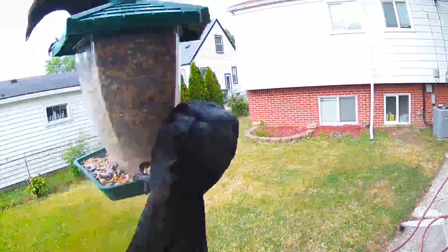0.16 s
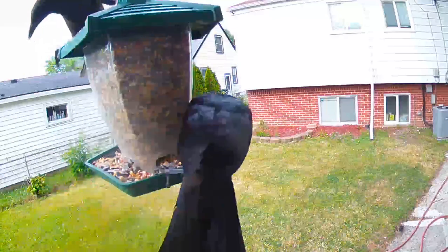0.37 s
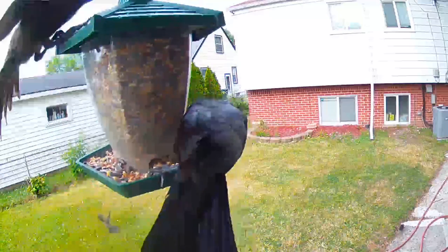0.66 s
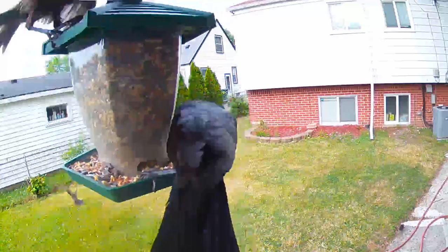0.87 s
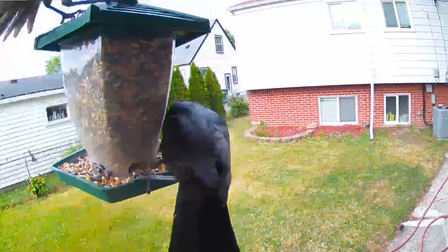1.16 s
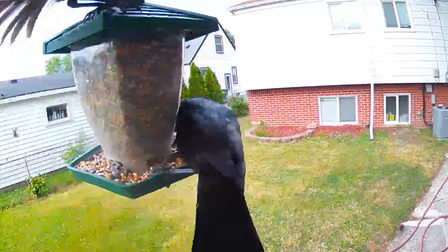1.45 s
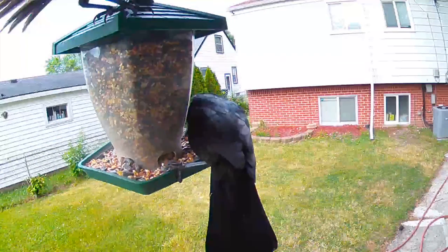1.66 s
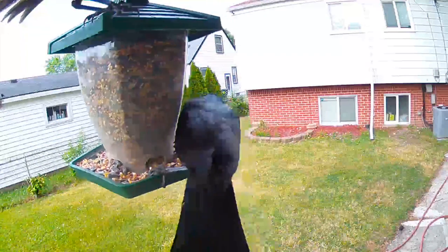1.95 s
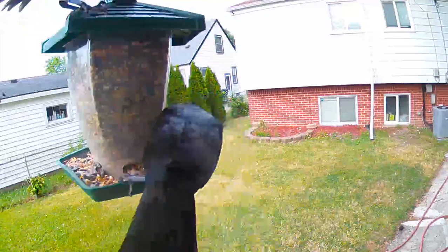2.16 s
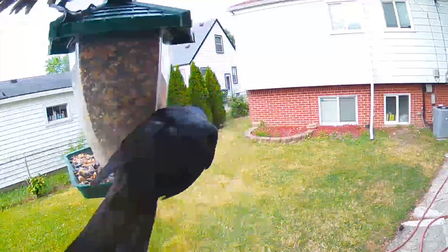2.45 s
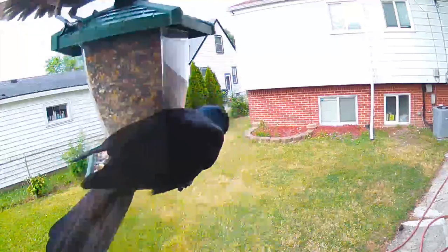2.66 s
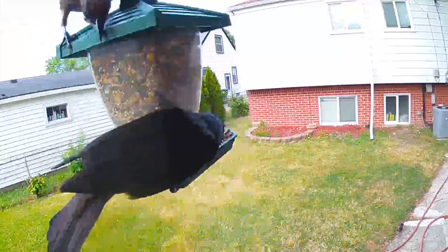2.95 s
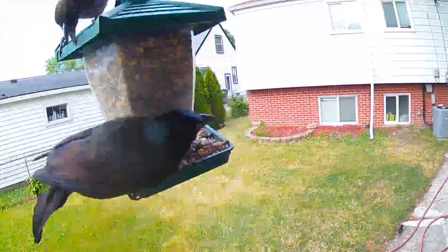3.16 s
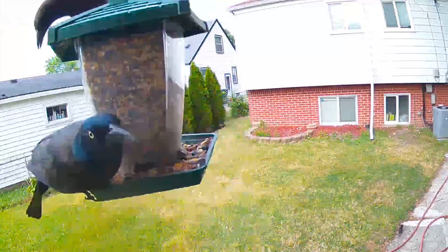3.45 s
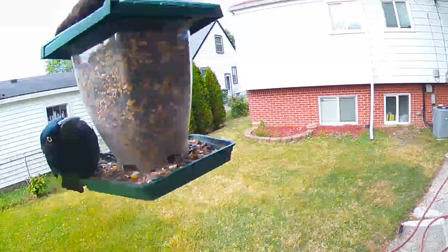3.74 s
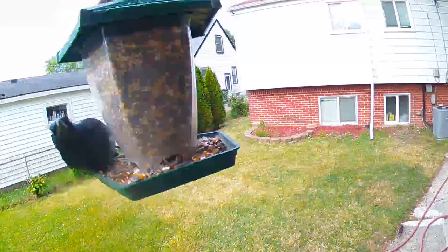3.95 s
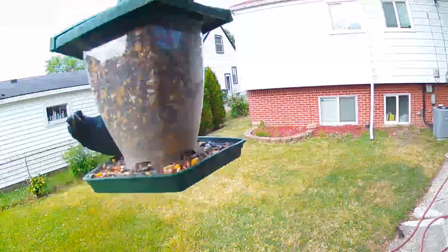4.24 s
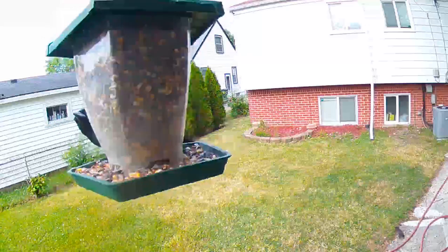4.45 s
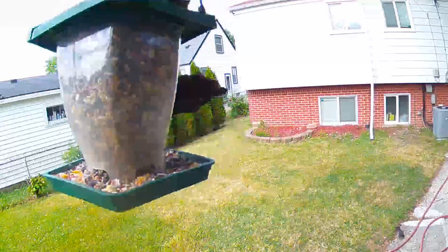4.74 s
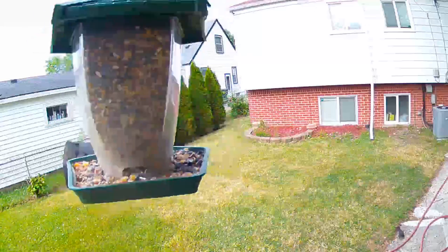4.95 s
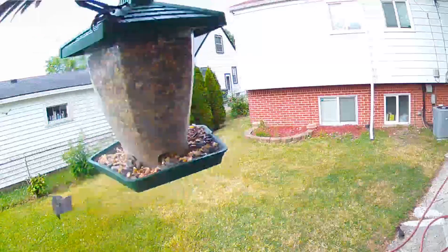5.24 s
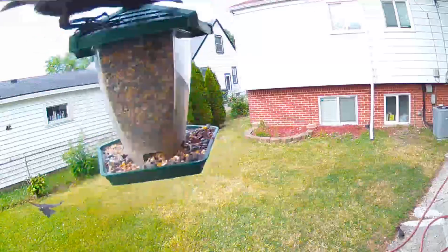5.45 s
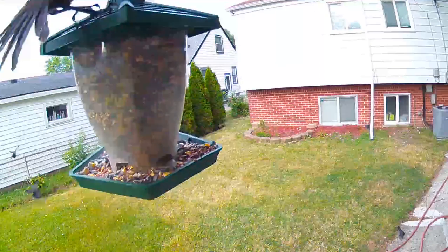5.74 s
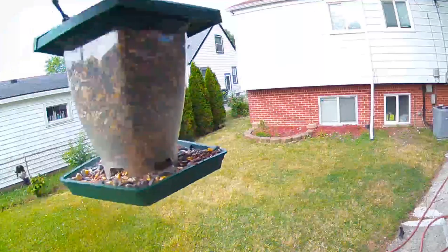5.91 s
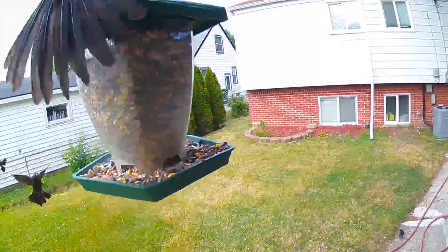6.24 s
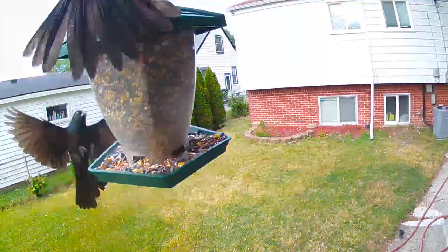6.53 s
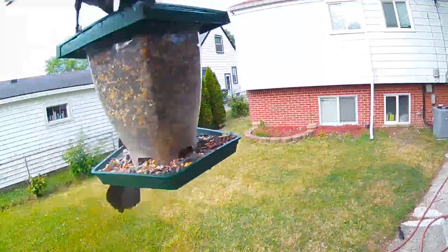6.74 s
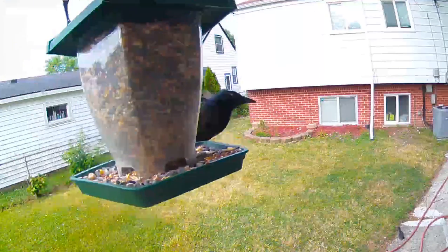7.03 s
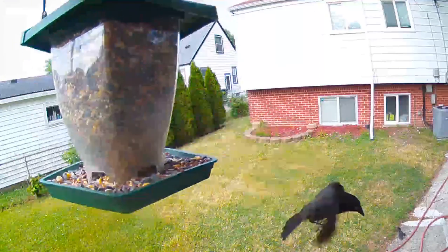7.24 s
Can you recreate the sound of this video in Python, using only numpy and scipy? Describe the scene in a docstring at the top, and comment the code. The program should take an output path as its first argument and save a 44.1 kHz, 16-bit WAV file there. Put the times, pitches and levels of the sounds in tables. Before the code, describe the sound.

Very close to the microphone, large blackbirds shuffle on a plastic seed feeder: dry cracks, short hollow tray taps, brushing feathers and falling seed. It quiets as sparrows chirp and faint rasps answer farther off. A loud grating call bursts out nearby, then heavier knocks and landings return with a low buffet of air. Two more rasps follow, over a soft suburban wash and low hum, with short echoes from house fronts.

```python
"""Blackbirds at a hanging plastic seed feeder, close to the microphone, over a suburban yard's wash and hum.
At first they shuffle and peck: brushing noise, sharp cracks and short rings of the tray. Short broad puffs, probably
of wings, come at 0.7 and 1.3 s, sparrows chirp from 1.4 s in gliding tones, and far rasps answer from 1.8 s. At 2.7 s
a near bird rasps with two voices at once. A faint whistle follows at 4 s, then from 4.4 s more shuffling and hard
landings. At about 5.3 s low noise buffets the microphone. Near rasps return at 5.5 and 6.3 s; house fronts echo."""
import sys
import numpy as np
from scipy import signal
from scipy.fft import rfft, irfft
from scipy.io import wavfile
from scipy.ndimage import uniform_filter1d

SR = 44100
rng = np.random.default_rng(int(sys.argv[2]) if len(sys.argv) > 2 else 0)


def digitize_waveform(pressure):
    """Quantize a signal to 16-bit integers and store it at the path in sys.argv[1].

    Rows of a 2-D input are taken as channels; values are limited to [-1, 1].
    """
    field = np.atleast_2d(pressure).T
    bounded = np.clip(field, -1, 1)
    quanta = np.round(bounded * 32767).astype(np.int16)
    wavfile.write(sys.argv[1], SR, quanta)


N = 325017  # length of the scene in samples
T = np.arange(N) / SR  # time in seconds

# The steady wash of the yard. Each row: frequency in Hz, relative level in dB per Hz.
YARD_COLOUR = [(12, -42.5), (20, -37.5), (86, -4), (180, -8), (239, -7), (324, -19.5), (398, -9),
               (452, -17.5), (569, -21), (1840, -33), (2260, -32), (2510, -32), (7530, -38), (9000, -62.5),
               (11700, -90), (19800, -120)]
YARD_DB = -57
# A distant machine's hum. Each row: frequency in Hz, level in dB.
HUM = [(96.9, -64.5), (145.3, -63), (296.1, -68.5), (393.0, -78), (495.3, -76)]
# Puffs of breeze on the microphone. Each row: time of the crest in seconds, level in dB.
PUFFS = [(.43, -46), (1.05, -58), (1.33, -49), (2.87, -72), (4.59, -51.5), (5.26, -38), (5.52, -45.5),
         (5.81, -49), (6.96, -50.5)]
PUFF_RISE_DB_PER_S, PUFF_FALL_DB_PER_S, CALM_DB = 135.5, 61.5, -77.5

# A faint level whistle far off. One row: start in seconds, length in seconds, pitch in Hz, level in dB.
WHISTLE = (4.05, .21, 2599, -68.5)
# The shape of a sparrow's chirp. Each row: time in seconds, pitch in Hz before the note's own factor,
# level in dB relative to the note.
CHIRP_SHAPE = [(0, 3970, -6), (.008, 4740, 4.5), (.024, 4866, 3), (.032, 3950, 3), (.042, 3165, -19),
               (.05, 3346, -1), (.062, 4200, 3), (.068, 3300, -3.5), (.085, 2800, 6.5), (.09, 2700, -25)]
# Sparrow notes. Each row: start in seconds, level in dB, pitch factor, share of the chirp that is sung.
CHIRPS = [(1.436, -62, 0.94, 0.82), (2.357, -63.5, 1.02, 0.97), (3.195, -61, 0.94, 0.85),
          (3.474, -59.5, 0.99, 0.95), (3.766, -70.5, 1.04, 0.37), (3.865, -73, 1.07, 0.38),
          (4.15, -60, 1.02, 0.93), (5.065, -62.5, .95, 0.44), (5.807, -67, 1.07, 0.37),
          (5.895, -59.5, 1.02, 0.36), (5.94, -78, 0.69, .3), (5.98, -67, 0.9, 0.29),
          (6.155, -71, 0.92, 0.4), (6.678, -60.5, 0.92, 0.33), (6.755, -65, 1.06, 0.41),
          (5.14, -62, 1.1, 0.37), (7.191, -66, 1, .3)]
# Two short broad puffs, probably of wings, at 0.7 and 1.3 s, then far rasps from 1.8 s. Each row: start in seconds,
# length in seconds, level in dB, size factor of the three lower resonances, size factor of the two upper ones,
# lift of the upper ones in dB, widening factor of all resonances.
PUFFS_AND_FAR_RASPS = [(0.668, 0.061, -44.5, 0.52, 0.84, -4, 4.7),
                       (1.259, 0.075, -51.5, 0.73, 0.95, -3, 2.7),
                       (1.762, .29, -58.5, 0.77, 0.87, -1.5, 3.6), (2.459, 0.31, -61.5, 0.88, 0.8, -9, 4.1),
                       (3.435, 0.3, -62, 0.81, 0.77, 0, 4.8), (4.324, 0.29, -62.5, 0.82, 0.82, 7.5, 3.2)]

# Lumps of low turbulence on the microphone; the rows from 5.255 to 5.351 s shape one buffet.
# Each row: middle in seconds, level in dB, half length in seconds, top of the turbulence in Hz.
LUMPS = [(5.255, -30.5, .02, 70.4), (5.287, -11.5, 0.015, 207), (5.31, -16.5, 0.011, 373),
         (5.319, -16.5, 0.01122, 101), (5.351, -32.5, 0.036, 120), (5.458, -35.5, 0.015, 89),
         (5.814, -36, .018, 100), (6.429, -38.5, 0.00612, 300), (1.339, -46.5, 0.014, 247),
         (.39, -44, .03, 89.5), (4.676, -47, 0.043, 90)]
# Feathers and feet brushing the feeder, one table a spell of shuffling. Each row: time in seconds, level in dB,
# brightness (treble above that level) in dB.
RUSTLE_SPELLS = [
    [(0.0, -64, 0.5), (0.192, -66.5, 2), (0.578, -55.5, 1.5), (0.9, -69.5, 7), (1.092, -63.5, 7),
     (1.388, -61.5, 2), (1.65, -69, -8)],
    [(4.42, -65, 7.5), (4.642, -56, -1.7), (4.784, -66.5, -1), (5.092, -68.5, 2), (5.268, -54.5, 1),
     (5.56, -56, -2), (5.696, -59.5, 1), (6.046, -82.5, 11), (6.58, -79, 18.5), (6.884, -64.5, 5.5),
     (7.37, -66.5, 3.5)],
]
# The colour of the brushing. Each row: frequency in Hz, relative level in dB per Hz.
RUSTLE_COLOUR = [(180, -47.5), (300, -7), (629, -0.5), (1540, -5.5), (3100, -6), (3890, -8.5), (6130, -11),
                 (7920, -11), (9000, -31), (11700, -52), (19800, -120)]
# Wing and tail feathers sweeping past. Each row: middle in seconds, level in dB, half length in seconds,
# brightness in dB.
SWISHES = [(.01, -59.5, 0.018, 8.5), (0.054, -60, 0.0072, 1), (0.147, -44.5, 0.022, 6),
           (0.205, -46.5, 0.025, 1.5), (0.265, -64.5, 0.01, 16.5), (0.374, -56, 0.012, 8),
           (0.547, -52.5, 0.005, 0), (0.868, -63, 0.0085, 12.5), (0.901, -57.5, .008, 11),
           (0.941, -61, 0.02, 11), (1.041, -60.5, 0.02, 14), (1.048, -61, 0.015, 2), (4.508, -71, 0.01, 26),
           (4.645, -62, 0.0055, 8), (5.337, -53.5, 0.0046, 16.5), (5.381, -49, 0.005, 8),
           (5.562, -49.5, 0.033, -8), (5.919, -58, 0.006, 9.5), (6.765, -69, 0.0096, 16)]

# The clear blows of claws, bill and seed. Each row: start in seconds, crack level in dB, crack centre in Hz,
# tray ring level in dB, length in seconds (the crack loses 32 dB in it).
TAPS = [(0.0273, -37, 3500, -50, 0.014), (0.208, -28.5, 6720, -24, .006), (0.3675, -29, 6400, -53, 0.0087),
        (0.4107, -30, 2240, -31.5, 0.015), (0.4678, -28.5, 3960, -37.5, 0.0068),
        (0.495, -30.5, 4100, -38, 0.015), (0.5035, -34, 4260, -36, .018), (0.5404, -37, 6740, -40.5, 0.02),
        (0.571, -32.5, 4600, -35.5, 0.011), (0.6138, -29.5, 7280, -35, .004), (0.643, -34, 6630, -41, .012),
        (0.752, -38, 7500, -45, .014), (0.961, -37.5, 2970, -39.5, 0.017), (1.014, -29.5, 7190, -45, .018),
        (1.052, -37, 6910, -31.5, 0.017), (1.0929, -36.5, 3240, -43, 0.0099),
        (1.124, -40, 6960, -63, 0.0062), (1.1625, -44, 3360, -42.5, .011), (1.19, -26, 6860, -44, 0.022),
        (1.2102, -30, 3400, -39.5, 0.0034), (1.5579, -39, 3000, -40.5, 0.02),
        (2.1467, -49, 3700, -63, 0.013), (2.5194, -37.5, 4140, -45.5, .013),
        (2.6973, -39, 3300, -35.5, 0.012), (3.186, -48, 4440, -50, 0.021), (3.2904, -50, 7560, -70, .012),
        (4.49, -24.5, 7970, -61, 0.0049), (4.5313, -32, 5370, -60, .0077),
        (4.573, -28, 3020, -32.5, 0.0041), (4.5873, -50, 2220, -30, .012), (4.6114, -45, 2920, -25, .012),
        (4.6295, -24.5, 4500, -33, 0.0037), (4.7143, -40, 2180, -21.5, 0.0078),
        (4.7226, -51, 2810, -30, .012), (4.801, -20, 3220, -25, 0.0072), (4.9822, -54, 2740, -28.5, 0.016),
        (5.095, -34, 6900, -42, .017), (5.1038, -37, 3440, -41, 0.025), (5.145, -36.5, 2310, -29.5, 0.021),
        (5.1996, -37.5, 5960, -55, 0.023), (5.2154, -31, 3060, -36, 0.014), (5.309, -48, 2100, -34, .012),
        (5.337, -29, 3020, -38, .01), (5.3464, -28, 2540, -22.5, .017), (5.359, -35, 2900, -25, .01),
        (5.3728, -23, 3690, -40, 0.011), (5.394, -35, 2710, -21.5, .0091), (5.417, -37.5, 4100, -33, .0085),
        (5.4433, -34.5, 2830, -25, 0.0098), (5.5615, -48, 3220, -21.5, .011), (5.594, -40, 7160, -45, .01),
        (5.6114, -29.5, 2360, -19.5, 0.011), (5.625, -40, 2870, -30, .012), (5.668, -41.5, 7120, -46, .011),
        (5.717, -37, 7390, -45, .014), (5.908, -42, 4930, -59, .02), (6.026, -50, 2690, -30.5, .012),
        (6.111, -41, 4220, -52, 0.014), (6.137, -40.5, 4340, -35.5, 0.01), (6.154, -38.5, 4400, -53, .0052),
        (6.4386, -30, 3010, -26.5, 0.0091), (6.671, -39, 6800, -63, .01), (6.682, -37, 4400, -63, .008),
        (6.7521, -39, 7740, -57, .0092), (6.8377, -31.5, 3100, -66, 0.0038),
        (6.8985, -37, 2500, -25.5, 0.012), (6.9104, -54, 2840, -29.5, .012), (6.923, -39.5, 4660, -48, .01),
        (7.1084, -41.5, 2900, -48, 0.0073), (7.1973, -51, 2860, -32.5, .012)]
# The ringing tones of the tray, before each blow's own shift. Each row: frequency in Hz, relative level in dB,
# time to fall by 60 dB in seconds.
TRAY = [(350.6, -5, 0.057), (516, -8, 0.029), (772, 3, 0.02), (942, 6, .025), (1255, -1, 0.009),
        (1650, -26, 0.009), (2520, -18, 0.0057), (2890, -10, 0.014)]
# Faint ticks of falling seed: level above the rustle's treble, scatter either way, tray ring against the crack.
TICK_DB, TICK_SCATTER_DB, TICK_RING_DB = 11.5, 8.5, -10
TICKS_PER_S, TICK_S, TICK_LOW_HZ, TICK_HIGH_HZ = 12, .01, 3000, 7500

# Three resonances of the windpipe, then two of the open bill, before each call's own factors.
# Each row: frequency in Hz, width in Hz, level in dB.
THROAT = [(1920, 1270, -21.5), (3357, 520, 1), (4080, 1200, -12), (5920, 640, -10.5), (7570, 880, -7.5)]
# Near rasps, one table a call, a point at each crest and trough of the throb. Each row: time in seconds,
# pitch of the low voice in Hz, level of the rasp in dB.
NEAR_CALLS = [
    [(2.7, 399.5, -63), (2.72, 439.6, -40.5), (2.737, 522, -26.5), (2.772, 653.2, -21), (2.794, 563, -26),
     (2.826, 651, -21), (2.85, 547, -27), (2.882, 689.7, -21), (2.9, 500, -33.5), (2.925, 470.8, -38.5),
     (2.942, 517, -31.5), (2.953, 565.6, -23.5), (2.97, 659.6, -24), (2.99, 450.6, -30.5), (3.01, 408, -48)],
    [(5.468, 432.5, -50), (5.488, 540, -30), (5.52, 688, -26), (5.535, 637, -32), (5.552, 438, -53)],
    [(6.262, 410.5, -58), (6.283, 445.4, -41), (6.298, 520.3, -34), (6.338, 682, -27),
     (6.362, 572.4, -33.5), (6.392, 680.6, -25), (6.415, 550.3, -34.5), (6.443, 681, -28),
     (6.475, 545, -37), (6.514, 702, -29), (6.535, 520, -40), (6.552, 429, -43), (6.58, 400, -50)],
]
# The voice of each near call. Each row: throat size factor, bill size factor, bill level in dB, level of the voices'
# sum tone in dB, high voice pitch factor, low voice lift in dB, high voice lift in dB, how much more both voices
# follow the rasp in dB per dB.
VOICES = [(0.96, 1.01, -0.5, -6, .995, -0.6, 0.6, 0.05), (0.89, 0.876, -12, -19, 1.06, -5, .5, .6),
          (0.94, 0.98, -5.5, 1, 1.04, -5, 1, .9)]
# One number a near call: a factor on breath and on unsteadiness of pitch and level.
HOARSENESS = [.85, 1.5, 1.3]
# Tighter membranes: what goes with the low voice's pitch, before each call's own factor and lifts.
# Each row: low voice in Hz, high voice in Hz, low voice level in dB, high voice level in dB.
EFFORT = [(401, 640, -76, -52.5), (439.8, 826, -65, -43), (472.3, 945, -57, -41), (520.4, 985, -51, -44),
          (560, 1000, -47, -42), (651.4, 1105, -39, -41), (699, 1140, -39, -38.5)]
FULL_RASP_DB = -25  # the rasp level at which the two bare voices get no extra lift or sag

EDGE_HZ = 9200  # the band limit of the recorder


def gain_of(db):
    """Turns decibels into a plain multiplier."""
    return 10 ** (np.asarray(db) / 20)


def evened(x):
    """Scales a sound to rms 1."""
    return x / np.sqrt(np.mean(x ** 2) + 1e-20)


def add(mix, s, sound):
    """Adds a sound at s seconds, cut off at the end of the mix."""
    part = mix[max(round(s * SR), 0):][:len(sound)]
    part += sound[:len(part)]


def low(x, hz):
    """Keeps what lies below hz."""
    return signal.sosfilt(signal.butter(2, hz, fs=SR, output="sos"), x)


def resonate(x, hz, width):
    """Shifts hz down to zero, smooths, and shifts back: a resonance of gain 1."""
    turn = np.exp(2j * np.pi * hz * np.arange(len(x)) / SR)
    r = np.exp(-np.pi * width / SR)
    return 2 * (turn * signal.lfilter([1 - r], [1, -r], x / turn)).real


def resonate_twice(x, hz, width):
    """Two equal resonances in a row fall off more steeply."""
    return resonate(resonate(x, hz, width), hz, width)


def coloured(x, points):
    """Gives x a spectrum drawn on a log-frequency axis, rms 1."""
    f, db = np.transpose(points)
    hz = np.fft.rfftfreq(len(x), 1 / SR)
    curve_db = np.interp(np.log(hz + 1), np.log(f), db)
    return evened(irfft(rfft(x) * gain_of(curve_db), len(x)))


def wander(count, span):
    """Slow chance of rms 1 that changes over span seconds."""
    size = max(int(span * SR), 2)
    return evened(uniform_filter1d(uniform_filter1d(rng.standard_normal(count), size), size))


def breeze_db():
    """Each puff swells quickly and dies slowly, down to a calm."""
    puffs = []
    for s, db in PUFFS:
        slope = np.where(T < s, PUFF_RISE_DB_PER_S, PUFF_FALL_DB_PER_S)
        puffs.append(db - slope * abs(T - s))
    return np.maximum(np.max(puffs, axis=0), CALM_DB)


def yard():
    """Steady wash whose low part swells, a wavering hum, and breeze on the microphone."""
    wash = gain_of(YARD_DB) * coloured(rng.standard_normal(N), YARD_COLOUR)
    swell = gain_of(3.0 * wander(N, 0.12))
    wash = wash + (swell - 1) * low(wash, 890.0)
    # noise through narrow resonances gives tones that waver
    hum = sum(gain_of(db) * evened(resonate_twice(rng.standard_normal(N), hz, 11.0)) for hz, db in HUM)
    air = coloured(rng.standard_normal(N), [(10, -12.5), (30, 0), (55, -11), (120, -31), (300, -68.0)])
    fizz = gain_of(-87.5) * evened(resonate(rng.standard_normal(N), 8150., 700.))  # the microphone's own hiss peak
    return wash + hum + fizz + gain_of(breeze_db()) * air


def walls(x, t60):
    """Scattered returns from the house fronts, falling by 60 dB in t60 seconds."""
    t = np.arange(SR // 2) / SR
    arrival = np.clip(t / 0.0075 - .5, 0, 1)
    tail = rng.standard_normal(len(t)) * gain_of(-60 * t / t60) * arrival
    return signal.fftconvolve(x, tail / np.linalg.norm(tail))[:N]


def whistle(s, length, hz, db):
    """A fuzzy steady note: noise through a narrow resonance."""
    note = evened(resonate_twice(rng.standard_normal(round(length * SR)), hz, 220.))
    return s, gain_of(db) * note * np.hanning(len(note))


def chirp(s, db, pitch, share):
    """A whistle with a fast flutter, cut short for the brief notes."""
    at, hz, level_db = np.transpose(CHIRP_SHAPE)
    t = np.arange(0, at[-1] * min(share, 1), 1 / SR)
    turns = np.cumsum(pitch * np.interp(t, at, hz)) / SR
    flutter = 1 + .45 * np.cos(2 * np.pi * 300 * t)
    level = gain_of(db + np.interp(t, at, level_db))
    return s, level * flutter * np.sin(2 * np.pi * turns) * signal.windows.tukey(len(t), .15)


def turning(hz, unsteady):
    """Phase of a membrane whose pitch is a little unsteady."""
    return 2 * np.pi * np.cumsum(hz * (1 + unsteady * wander(len(hz), 0.0036))) / SR


def mixed(low_hz, high_hz):
    """Two membranes drive each other: a tone at every sum of their multiples."""
    a, b = turning(low_hz, .005), turning(high_hz, .008)
    phase = 2 * np.pi * rng.random((16, 8))
    return evened(sum(.95 ** m * .65 ** n * np.cos(m * a + n * b + phase[m, n])
                      for m in range(1, 16) for n in range(8)))


def throat(x, size, bill, bill_db, spread=1.43):
    """Steep resonances: three of the windpipe, two of the open bill."""
    sizes, lifts = [size] * 3 + [bill] * 2, [0] * 3 + [bill_db] * 2
    voice = 0
    for k, (hz, width, db) in enumerate(THROAT):
        peak = resonate_twice(x, hz * sizes[k], spread * width)
        voice = voice + (-1) ** k * gain_of(db + lifts[k]) * peak  # neighbours have opposite signs
    return evened(voice)


def puff_or_far_rasp(s, length, db, size, bill, bill_db, spread):
    """Two voices and noise in widened resonances, throbbing and fading: a far rasp, or a broad puff if very short."""
    t = np.arange(0, length, 1 / SR)
    throb = np.cos(2 * np.pi * 18 * t)
    voices = mixed(600 * (1 + 0.0704 * throb), 1080 * (1 + 0.048 * throb)) + rng.standard_normal(len(t))
    body = throat(voices, size, bill, bill_db, spread=max(spread, 1))
    level = gain_of(db + 1.1 * throb - 4.1 * t / length)
    return s, level * body * signal.windows.tukey(len(t), min(0.058 / length, 1))


def turbulence_lump(s, db, half, hz):
    """A lump of low turbulence with a thin rattle of finer eddies at its height."""
    t = np.arange(-2 * half, 2 * half, 1 / SR)
    noise, bell = rng.standard_normal(12000), np.exp(-(t / half) ** 2)
    swirl = low(low(noise, hz), 2.3 * hz)[-len(t):]  # the end, where the filters have settled
    eddies = low(low(noise, 3. * hz), 4.5 * hz)[-len(t):]
    push = evened(swirl - low(swirl, .3 * hz)) + .12 * bell ** 2 * evened(eddies)
    return s - 2 * half, gain_of(db) * bell * np.tanh(1.21 * push)  # the membrane nears its stop


def rustle():
    """Brushing noise in short clumps: a slow bed and quick sweeps, each with its own brightness."""
    brush = coloured(rng.standard_normal(N) * gain_of(2. * wander(N, 0.0036)), RUSTLE_COLOUR)
    dull = low(brush, 7300.0)
    body, sheen = np.zeros((2, N))  # the loudness of the dull part and of the treble
    for rows in RUSTLE_SPELLS:
        s, db, bright_db = np.transpose(rows)
        body = body + gain_of(np.interp(T, s, db, -120, -120) + 2.5 * wander(N, 0.027))
        sheen = sheen + gain_of(np.interp(T, s, db + bright_db, -120, -120) + 3.75 * wander(N, 0.014))
    for s, db, half, bright_db in SWISHES:
        t = np.arange(-2 * half, 2 * half, 1 / SR)
        t = t[max(round((2 * half - s) * SR), 0):]  # drop what lies before the scene starts
        bell = np.exp(-(t / half) ** 2)
        add(body, s + t[0], gain_of(db) * bell)
        add(sheen, s + t[0], gain_of(db + bright_db) * bell)
    return body * dull + sheen * (brush - dull)


def ticks():
    """Falling seed: rows like those of TAPS, one at a random place in each short slot of a spell."""
    slots = np.concatenate([np.arange(rows[0][0], rows[-1][0], 1 / TICKS_PER_S) for rows in RUSTLE_SPELLS])
    place, size, bright = rng.random((len(slots), 3)).T
    at, level_db, bright_db = np.concatenate(RUSTLE_SPELLS).T
    s = slots + place / TICKS_PER_S
    db = np.interp(s, at, level_db + bright_db) + TICK_DB + TICK_SCATTER_DB * (2 * size - 1)
    hz = TICK_LOW_HZ * (TICK_HIGH_HZ / TICK_LOW_HZ) ** bright
    return list(zip(s, db, hz, db + TICK_RING_DB, TICK_S + 0 * db))


def tap(s, crack_db, hz, ring_db, length, seeds):
    """A burst of scratches around hz, and a blow that rings the tray; long scrapes start softly."""
    t = np.arange(len(seeds) - 2 * len(TRAY)) / SR
    noise = seeds[:len(t)]  # seeds are random numbers: noise first, then the tray's shifts
    length = max(length, .002)
    rise = length * np.clip(13.0 * length - .12, .09, .6)
    burst = noise * gain_of(-32 * t / length) * np.minimum(t / rise, 1)
    burst = burst * gain_of(6.0 * np.repeat(seeds[:40], 70)[:len(t)])  # a scrape breaks into slips
    crack = resonate_twice(burst, hz, 3000.) + 0.16 * np.diff(burst, prepend=0)
    crack = crack + .5 * resonate_twice(burst, 6870.0, 1800.)  # the clear hopper wall ticks along
    shifts, weights = seeds[len(t):].reshape(2, -1)  # each blow lands on another spot
    ring = sum(gain_of(db + 4.3 * w - 60 * t / t60) * np.sin(2 * np.pi * f * (1 + 0.066 * d) * t)
               for (f, db, t60), d, w in zip(TRAY, shifts, weights))
    loose_seed = 0.14 * evened(low(noise, 960.0)) * gain_of(-60 * t / 0.085)  # loose seed jumps
    ring = ring / abs(ring).max() + loose_seed
    return s - .001, gain_of(crack_db) * crack / abs(crack).max() + gain_of(ring_db) * ring


def call(rows, size, bill, bill_db, sum_db, high, low_lift_db, high_lift_db, follow, hoarse):
    """A rasp through the throat, over the bare low tones of both membranes and a little breath."""
    s, pitch, level_db = np.transpose(rows)
    t = np.arange(s[0], s[-1], 1 / SR)
    pitch = np.interp(t, s, pitch)
    steps, *laws = np.transpose(EFFORT)
    controls = [pitch] + [np.interp(pitch, steps, law) for law in laws] + [np.interp(t, s, level_db)]
    # round off the corners between points
    low_hz, high_hz, low_db, high_db, rasp_db = (uniform_filter1d(c, size=350) for c in controls)
    high_hz = high * high_hz
    sag_db = follow * (rasp_db - FULL_RASP_DB)

    breath = rng.standard_normal(len(t))
    drive = mixed(low_hz, high_hz) + .4 * hoarse * breath
    rasp = gain_of(rasp_db + 1.0 * wander(len(t), 0.0054)) * throat(drive, size, bill, bill_db)

    a, b = turning(low_hz, .008 * hoarse), turning(high_hz, .008 * hoarse)
    low_level = gain_of(low_db + low_lift_db + sag_db + 1.3 * hoarse * wander(len(t), .002))
    lows = low_level * (np.sin(a) + .7 * np.sin(2 * a))
    high_level = gain_of(high_db + high_lift_db + sag_db + 1.3 * hoarse * wander(len(t), .002))
    highs = high_level * (np.sin(b) + 0.39 * np.sin(2 * b) + gain_of(sum_db) * np.sin(a + b))

    husk = gain_of(rasp_db - 19.5) * evened(resonate_twice(breath, 1310.0, 1400.))
    return s[0], (rasp + husk + np.sqrt(2) * (lows + highs)) * signal.windows.tukey(len(t), .1)


def scene():
    """Places every sound in time and adds the echoes of the house fronts."""
    near, far, feeder, air = np.zeros((4, N))
    add(far, *whistle(*WHISTLE))
    for row in CHIRPS:
        add(far, *chirp(*row))
    for row in PUFFS_AND_FAR_RASPS:
        add(far, *puff_or_far_rasp(*row))
    for row in LUMPS:
        add(air, *turbulence_lump(*row))
    blows = TAPS + ticks()
    for row, seeds in zip(blows, rng.standard_normal((len(blows), 2600))):
        add(feeder, *tap(*row, seeds))
    for rows, voice, hoarse in zip(NEAR_CALLS, VOICES, HOARSENESS):
        add(near, *call(rows, *voice, hoarse))
    early = gain_of(-13) * walls(near, .11) + gain_of(-24) * walls(feeder, .08)
    late = gain_of(-27.5) * walls(near, 0.55) + gain_of(-4.0) * walls(far, 0.19)
    return (near + far + feeder + early + late + rustle() + air + yard())[None]


def record(dry):
    """The microphone fades toward its top, then the band limit over a faint converter hiss."""
    fade = signal.firwin(151, 8500, window=("kaiser", 8), fs=SR)
    soft = signal.oaconvolve(dry, fade[None], "same")
    edge = signal.firwin(801, EDGE_HZ, window=("kaiser", 9), fs=SR)
    cut = signal.oaconvolve(soft, edge[None], "same")
    return cut + gain_of(-103) * rng.standard_normal(dry.shape)


dry = scene()
out = record(dry)
digitize_waveform(out)
```